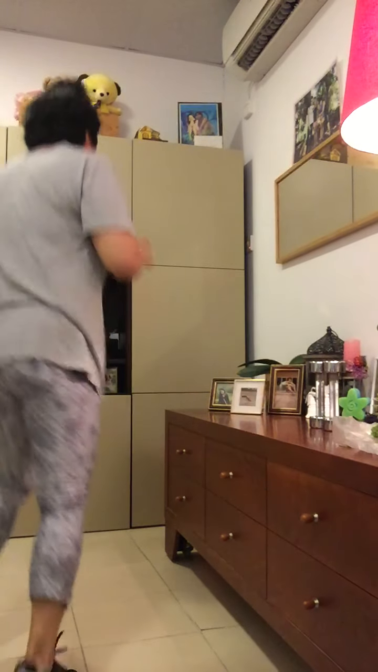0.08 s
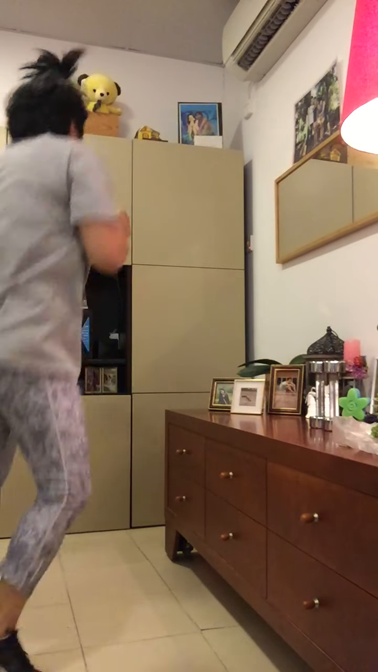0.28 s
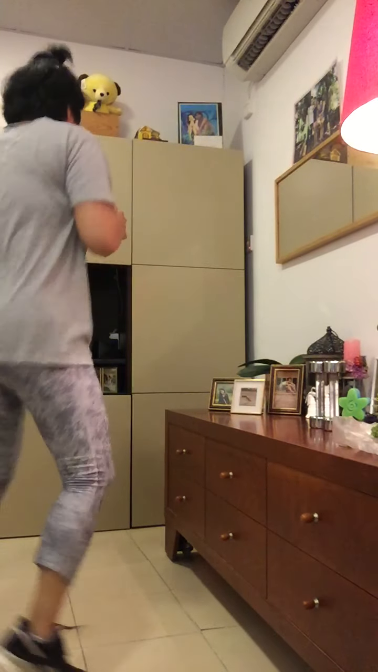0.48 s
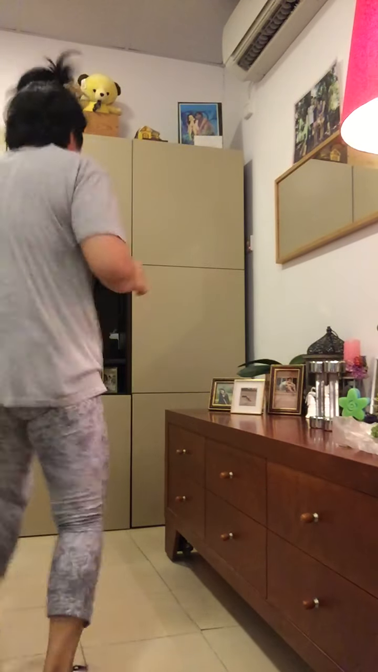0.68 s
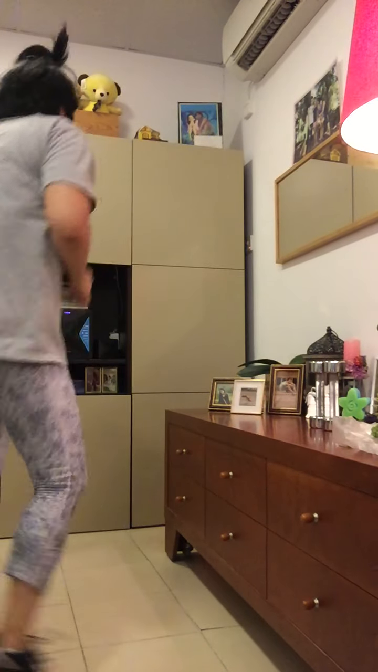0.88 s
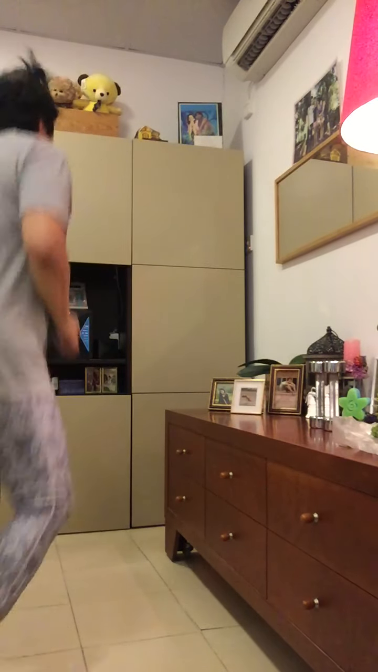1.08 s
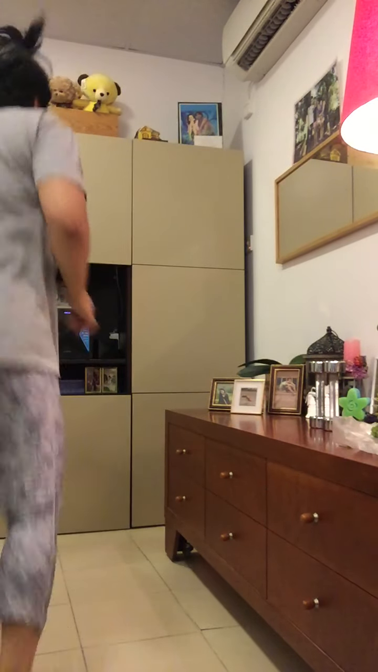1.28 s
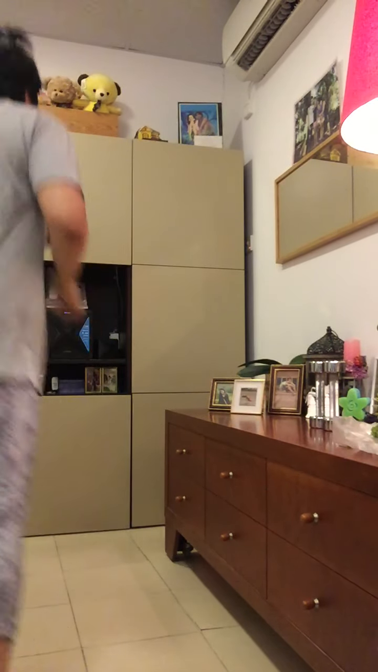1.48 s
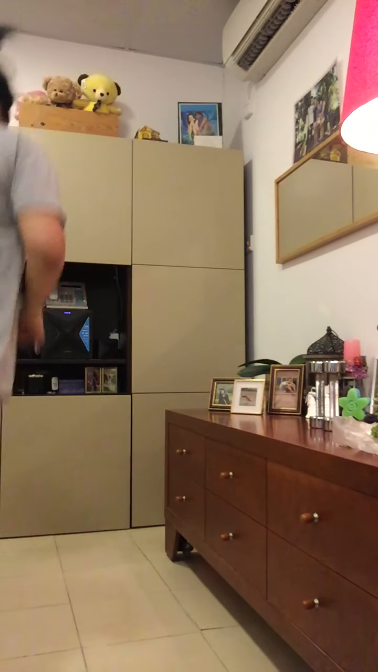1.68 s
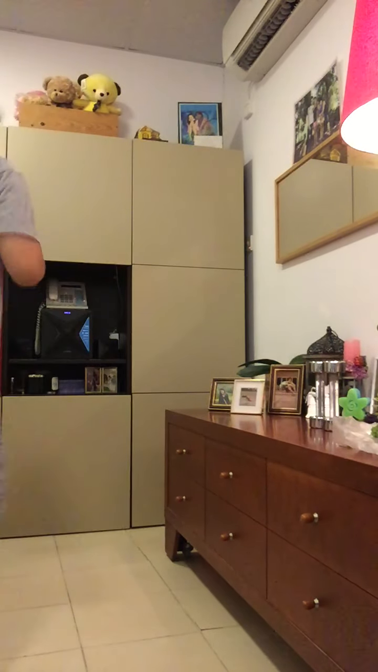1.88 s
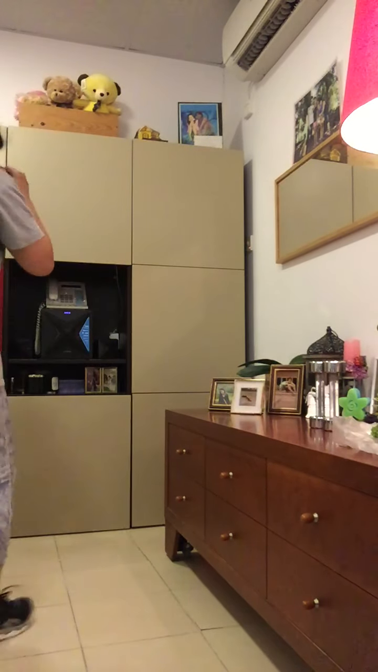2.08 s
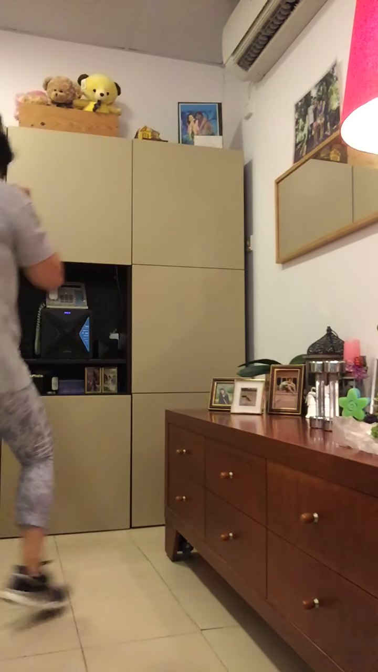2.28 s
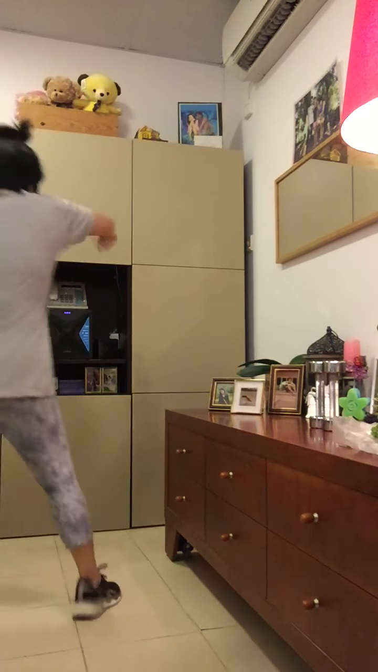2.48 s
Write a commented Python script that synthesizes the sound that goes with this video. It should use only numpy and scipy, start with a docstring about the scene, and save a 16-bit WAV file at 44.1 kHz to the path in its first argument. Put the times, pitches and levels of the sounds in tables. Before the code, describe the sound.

Rubber shoe soles work on a tiled floor in a small, reverberant room. Soft taps and scuffs open, then a strong shrill squeak at 0.25 s with a dull floor thump. Irregular taps follow, sharpest near 0.63 and 1.0 s, with a tiny chirp at 0.9. Scuffs and small squeaks come from 1.2 to 1.7 s, then it quietens until a tap and bright squeak at 2.2 s. Low rumble, hum and hiss continue.

```python
"""Running shoes work on a tiled floor in a small, hard-walled room, over low rumble, hum and faint hiss.
Taps (decaying noise bands and a sine pop) and scuffs (brushed noise) open and recur between squeaks;
soon the first deep floor swings (windowed sines) follow. From about 0.2 s to the end, rubber soles squeak
in short, shrill bursts (gliding harmonics with a rasp). The room rings after squeaks, taps and scuffs.
"""
import sys
import numpy as np
from scipy import signal
from scipy.fft import rfft, irfft, next_fast_len
from scipy.io import wavfile
from scipy.ndimage import map_coordinates

SR = 44100
rng = np.random.default_rng(int(sys.argv[2]) if len(sys.argv) > 2 else 0)


def file_out(sig):
    """Save sig as 16-bit WAV at sys.argv[1]."""
    # one column per channel
    cols = np.atleast_2d(sig).T
    # limit, then scale
    lim = np.clip(cols, -1, 1)
    pcm = np.round(lim * 32767).astype(np.int16)
    wavfile.write(sys.argv[1], SR, pcm)


N = 112455

# Stick-slip squeaks, levels before flutter and room: start_s, length_s, pitch_hz, glide (share of pitch),
# roughness (0-1), harmonic_1_db to harmonic_5_db, rasp_db
SQUEAK_EVENTS = [ (0.2255, 0.016, 2770, 0.028, 0.8, -68, -49.5, -64, -102, -90, -53),
                 (0.2331, 0.021, 2609, 0.074, 0.31, -27, -26, -38.5, -53.5, -55.5, -43.5),
                 (.249, 0.019, 2905, -0.083, 0.45, -28, -37.5, -61, -61, -60, -42),
                 (0.9079, 0.014, 2835, -0.14, 0.16, -36, -58.5, -83, -93, -90, -77),
                 (.909, 0.0089, 3340, -0.079, 0.51, -42.5, -68.5, -89, -84, -100, -57),
                 (1.252, 0.0173, 3653, -0.24, 1, -50, -76.5, -95, -100, -100, -70.5),
                 (1.259, 0.0042, 4210, 0.028, 0.79, -44, -80, -94, -100, -100, -76),
                 (1.52, 0.01, 2434, 0.013, 0.72, -60, -64, -80, -82, -81, -66),
                 (1.589, 0.006, 2520, 0.079, 1, -35, -44.5, -62, -75.5, -69, -51.5),
                 (1.595, 0.024, 2593, -0.0834, 0.36, -28.5, -41.5, -51.5, -67, -69, -48.5),
                 (1.6027, 0.0138, 2300, 0.021, 0.89, -43.5, -36, -53, -75, -79, -51),
                 (1.689, 0.031, 5770, -0.06, 0.22, -52.5, -89.5, -84, -97, -90, -72),
                 (2.219, 0.0045, 2950, -0.072, 0.8, -49, -47.5, -69, -83, -91, -57),
                 (2.2236, .012, 3015, 0.037, 0.1, -38, -35, -30, -40, -44, -44),
                 (2.229, 0.01, 3230, 0.061, 0.47, -31.5, -39.5, -53.5, -48.5, -63, -41), ]
# Relative spectrum of the squeak's rasp: frequency_hz, level_db
RASP_SPECTRUM = [(200, -13.5), (700, -19.5), (1400, -8), (2300, 4.5), (3300, 6.5), (6000, -8), (8500, -9),
                 (12000, -24), (15500, -21)]
# Heel and toe taps, levels before the common tap gain and room: start_s, thud_db, knock_db, slap_db,
# click_db, tick_db (the five noise bands, low to high), pop_hz, pop_db (hollow pop of the sole)
TAP_EVENTS = [ (.036, -56, -55.5, -50.5, -67, -82, 470, -49.5),
              (0.142, -79.5, -82.5, -52.5, -70, -88, 1170, -52),
              (0.302, -45.5, -50.5, -44.5, -40.5, -55, 623, -44),
              (.341, -44.5, -61, -41.5, -66, -81, 573, -48),
              (.626, -37.5, -42.5, -35, -42.5, -60, 3026, -28.5),
              (.638, -45, -41.5, -41.5, -74, -90, 684, -38.5),
              (.690, -41, -48.5, -40.5, -58, -71, 340, -64),
              (.829, -73.5, -72, -55, -70.5, -90, 1390, -48.5),
              (0.984, -41, -39, -38, -43.5, -74.5, 844, -35), (0.9907, -48, -62, -48, -52.5, -86, 587, -35),
              (1.055, -69, -58, -53.5, -54, -70, 780, -60), (1.079, -54, -74, -47.5, -60, -85, 690, -77),
              (1.3357, -40, -44.5, -42.5, -71, -84, 297, -40.5),
              (1.4071, -43, -52.5, -48, -47, -78, 362, -39),
              (1.700, -51, -53.5, -42.5, -66, -80, 844, -42.5),
              (1.723, -53, -49.5, -41.5, -69, -84, 158, -54),
              (1.821, -49, -47.5, -53.5, -61, -69, 600, -53.5),
              (1.853, -66, -59.5, -56, -69, -84.5, 709, -56), (2.226, -54, -44, -51, -58, -77.5, 753, -37),
              ]
# Pass bands of the tap noise, thud to tick: low_hz, high_hz
TAP_BANDS = [(140, 450), (550, 1200), (1200, 3500), (3400, 6000), (6000, 11000)]
# Decay of the noise fed to each tap band by 60 dB: t60_s
TAP_DECAYS = [0.021, 0.061, 0.02, 0.0042, 0.013]
# Soles brushing the tiles, levels before sway, envelope and room: start_s, length_s, level_db
SCUFF_EVENTS = [(0.037, 0.077, -73.5), (.141, 0.062, -65), (.44, 0.016, -65.5), (.85, 0.14, -70.5),
                (1.164, 0.018, -64), (1.23, 0.015, -61), (1.415, 0.015, -58.5), (1.516, 0.11, -66),
                (1.93, 0.035, -65)]
# Relative spectrum of brushing: frequency_hz, level_db
BRUSH_SPECTRUM = [(200, -12), (700, 7), (1500, 4), (4000, 7), (6500, -3), (9000, -18.5), (15000, -23)]
# Body weight shaking the floor: start_s, level_db
FOOTFALL_EVENTS = [(0.117, -51), (0.234, -49.5), (0.471, -50), (1.425, -50.5)]
# Relative spectrum of the low background: frequency_hz, level_db
RUMBLE_SPECTRUM = [(20, -39.5), (31, -29), (40, -7), (52, 1.5), (75, 0.5), (100, -2), (150, 3.5), (180, -1),
                   (230, -10), (300, -12.5), (370, -9), (500, -17.5), (900, -45)]
# Relative spectrum of the faint hiss: frequency_hz, level_db
HISS_SPECTRUM = [(100, -18.5), (400, -15), (800, -7.5), (1500, -9), (2500, -10.5), (5000, -18), (9000, -23),
                 (15500, -36)]
# Reverberation time of the room's tail: frequency_hz, t60_s
ROOM_DECAY = [(150, 0.67), (400, 0.22), (1000, 0.41), (2700, 0.33), (5500, 0.35), (9000, 0.28),
              (12000, 0.23), (15000, 0.15)]

# Scatter of pitch (share) and level at full roughness, and its speed in random knots per second
JITTER, FLUTTER_DB, JITTER_PER_S = 0.083, 3.5, 871
RISE_S, RELEASE_S = 0.0014, 0.0017  # onset of squeaks and scuffs, fall of a squeak
POP_T60_S, POP_REF_HZ, TAP_GAIN_DB = 0.032, 600, -7.5  # pop life at the reference pitch, gain of all taps
SHAKE_HZ, SHAKE_S = 51.4, 0.09
RUMBLE_DB, RUMBLE_SWAY_DB, HISS_DB = -60, 1, -70.5
HUM_HZ, HUM_DB, HUM_SWAY_DB = 49.6, -68.5, 2.5
WALL_S, BUILD_S = 0.003, 0.0035  # earliest reflection, rise of the tail
EARLY_DB, EARLY_S = -1, 0.028  # wall echoes: level against the tail, time span
SQUEAK_WET_DB, TAP_WET_DB, SCUFF_WET_DB = -3, -2, 4  # tail against direct sound
TOP_HZ = 15900


def squeaks():
    """Stick-slip friction: rubber catches and lets go thousands of times a second, a rough harmonic tone."""
    out, n = np.zeros(N), SR // 10
    t = np.arange(n) / SR
    for start, length, hz, glide, rough, *harmonics_db, rasp_db in SQUEAK_EVENTS:
        sweep = glide * (np.minimum(t / length, 1) - 0.5)
        pitch = hz * (1 + sweep + JITTER * rough * wobble(JITTER_PER_S, n))
        phase = 2 * np.pi * np.cumsum(pitch) / SR
        tone = np.zeros(n)
        for k, db in enumerate(harmonics_db, 1):
            if k * hz < SR / 2:  # no harmonic whose nominal pitch would alias
                tone += amp(db) * np.sqrt(2) * np.sin(k * phase)
        release = np.clip((length - t) / RELEASE_S + 0.5, 0, 1)
        grip = np.minimum(t / RISE_S, 1) * release
        grip *= amp(FLUTTER_DB * rough * wobble(JITTER_PER_S, n))
        rasp = amp(rasp_db) * noise(RASP_SPECTRUM, n)
        add(out, start, room(grip * (tone + rasp), SQUEAK_WET_DB))
    return out


def taps():
    """Impact excitation: sole on tile gives noise bands with their own decays and a short hollow pop."""
    out, t = np.zeros(N), np.arange(SR // 10) / SR
    bands = [signal.butter(4, edges, "bandpass", fs=SR, output="sos") for edges in TAP_BANDS]
    for start, *levels_db, pop_hz, pop_db in TAP_EVENTS:
        pop_t60 = POP_T60_S / np.sqrt(pop_hz / POP_REF_HZ)  # higher pops die sooner
        pop_decay = np.exp(-np.log(1000) * t / pop_t60)
        blow = amp(pop_db) * 2 * np.sin(2 * np.pi * pop_hz * t) * pop_decay
        for band, t60, db in zip(bands, TAP_DECAYS, levels_db):
            burst = signal.sosfilt(band, rng.standard_normal(len(t)) * amp(-60 * t / t60))
            blow += amp(db) * burst / np.std(burst[:SR // 100])  # level set over the first 10 ms
        add(out, start, room(blow * amp(TAP_GAIN_DB), TAP_WET_DB))
    return out


def scuffs():
    """Sliding friction without grip: a sole brushes the tiles as a short burst of uneven noise."""
    out, n = np.zeros(N), SR // 10
    t = np.arange(n) / SR
    for start, length, db in SCUFF_EVENTS:
        fade = np.sqrt(np.clip(1 - t / length, 0, 1))
        swell = np.minimum(t / RISE_S, 1) * fade
        grain = amp(db + 3 * wobble(200, n))
        add(out, start, room(grain * swell * noise(BRUSH_SPECTRUM, n), SCUFF_WET_DB))
    return out


def footfalls():
    """Forced vibration: shifting weight gives the floor a few deep swings under a half-sine envelope."""
    out, t = np.zeros(N), np.arange(int(SHAKE_S * SR)) / SR
    for start, db in FOOTFALL_EVENTS:
        envelope = np.sin(np.pi * t / SHAKE_S)
        add(out, start, amp(db) * envelope * np.sin(2 * np.pi * SHAKE_HZ * t))
    return out


def background():
    """Superposition of independent sounds: low rumble, a wavering hum and faint hiss."""
    rumble_gain = amp(RUMBLE_DB + RUMBLE_SWAY_DB * wobble(7.63, N))
    rumble = rumble_gain * noise(RUMBLE_SPECTRUM, N)
    phase = 2 * np.pi * HUM_HZ * np.arange(N) / SR + wobble(12, N)
    hum_gain = amp(HUM_DB + HUM_SWAY_DB * wobble(7.96, N))
    hum = hum_gain * np.sqrt(2) * np.sin(phase)
    return rumble + hum + amp(HISS_DB) * noise(HISS_SPECTRUM, N)


def room(x, wet_db):
    """Reverberation: direct sound, ten wall echoes and a diffuse tail, drawn anew for every contact."""
    hz, t, z = signal.stft(rng.standard_normal(SR), SR, nperseg=256)
    decay = amp(-60 * t / along(ROOM_DECAY, hz)[:, None])
    tail = signal.istft(z * decay, SR, nperseg=256)[1]
    tail *= np.clip((np.arange(len(tail)) / SR - WALL_S) / BUILD_S, 0, 1)
    where, strength = rng.random(size=10), rng.standard_normal(size=10)
    echo_index = ((WALL_S + EARLY_S * where) * SR).astype(int)
    walls = np.bincount(echo_index, strength, len(tail))
    early = amp(EARLY_DB) * walls / np.linalg.norm(walls)
    response = amp(wet_db) * (tail / np.linalg.norm(tail) + early)
    response[0] += 1  # direct sound
    wet = signal.fftconvolve(x, response)
    # output energy is the source energy times the response energy
    return wet * np.linalg.norm(x) / np.linalg.norm(wet) * np.linalg.norm(response)


def noise(spectrum, size):
    """Spectral shaping: white noise weighted in frequency and scaled to rms 1."""
    weights = amp(along(spectrum, np.fft.rfftfreq(size, 1 / SR)))
    return unit(irfft(rfft(rng.standard_normal(size)) * weights, size))


def wobble(rate, size):
    """Random modulation: a smooth curve through normal random knots, rate knots a second."""
    return map_coordinates(rng.standard_normal(512), [np.arange(size) * rate / SR], mode="wrap")


def along(points, hz):
    """Logarithmic frequency scale: interpolate (Hz, value) points on it."""
    f, v = np.transpose(points)
    return np.interp(np.log(hz + 1), np.log(f + 1), v)


def amp(db):
    """Decibel law: level to amplitude gain."""
    return 10 ** (np.asarray(db) / 20)


def unit(x):
    """Normalisation: scale to rms 1."""
    return x / np.sqrt(np.mean(x ** 2) + 1e-20)


def add(track, start, x):
    """Superposition: mix x into the track at start seconds."""
    part = track[max(round(start * SR), 0):][:len(x)]
    part += x[:len(part)]


def scene():
    """Superposition: the footwork over the background, as one channel."""
    return (squeaks() + taps() + scuffs() + footfalls() + background())[None]


def record(dry):
    """Band limiting: the recorder keeps nothing at or above its top frequency."""
    m = next_fast_len(N + SR // 2)
    passed = np.fft.rfftfreq(m, 1 / SR) < TOP_HZ
    return irfft(rfft(dry, m) * passed, m)[..., :N]


dry = scene()
out = record(dry)
file_out(out)
```